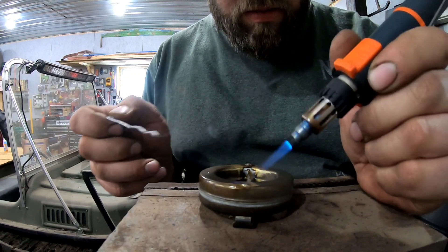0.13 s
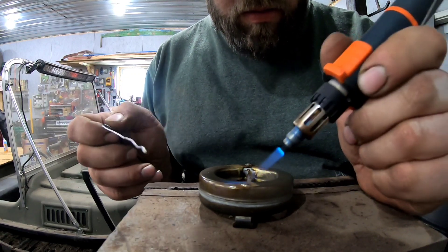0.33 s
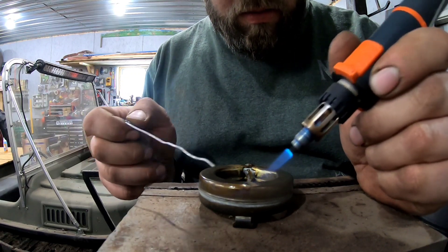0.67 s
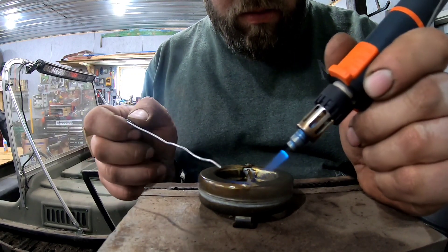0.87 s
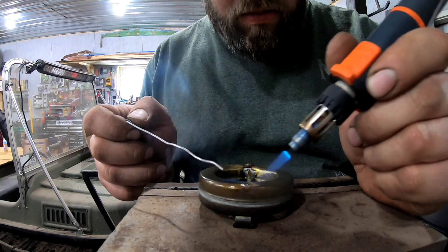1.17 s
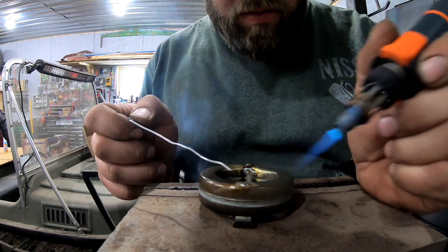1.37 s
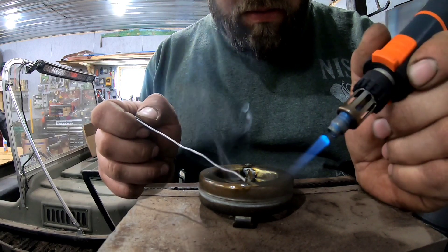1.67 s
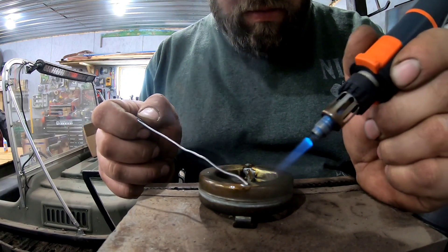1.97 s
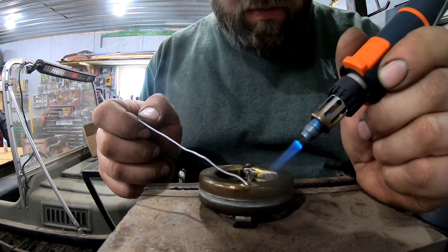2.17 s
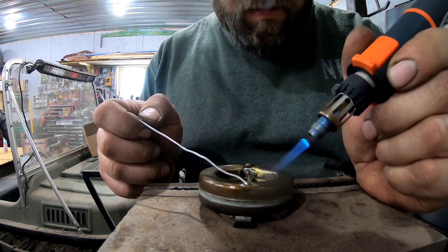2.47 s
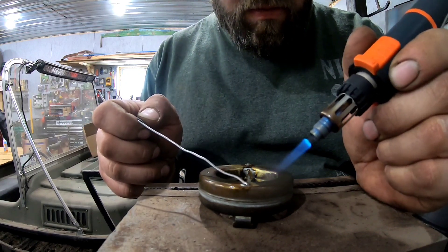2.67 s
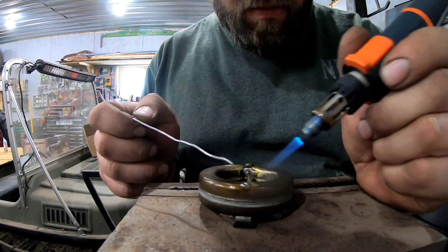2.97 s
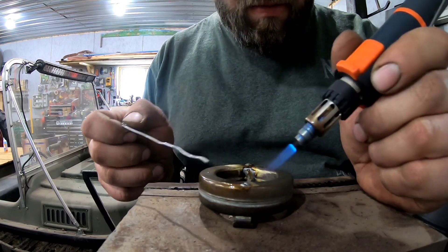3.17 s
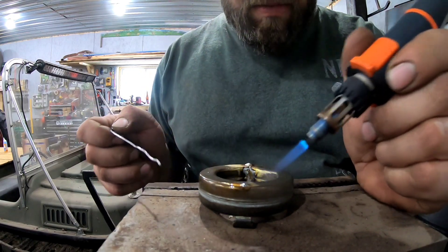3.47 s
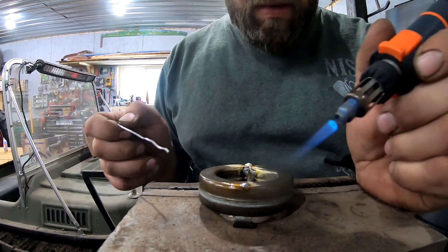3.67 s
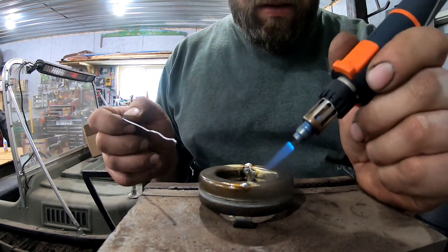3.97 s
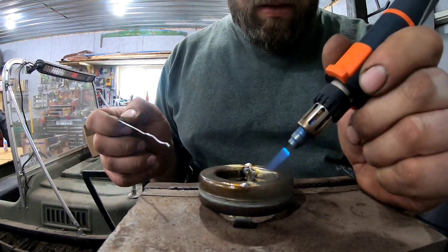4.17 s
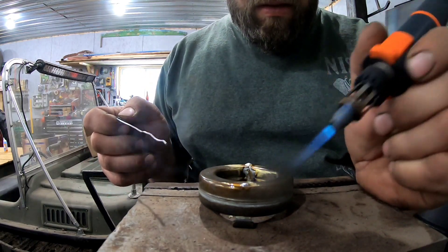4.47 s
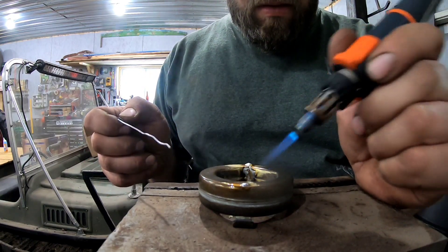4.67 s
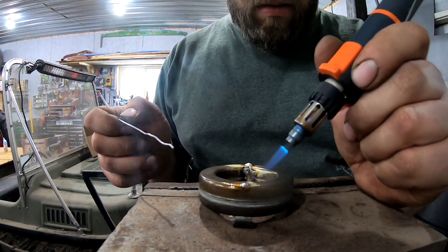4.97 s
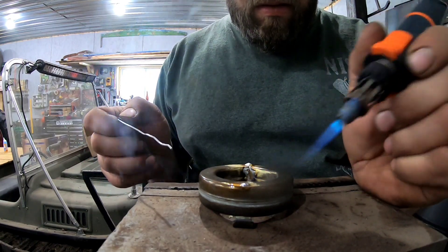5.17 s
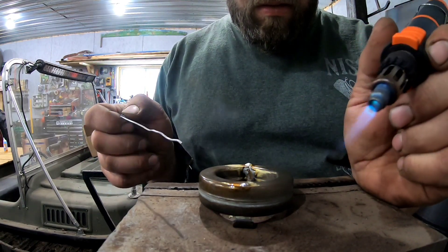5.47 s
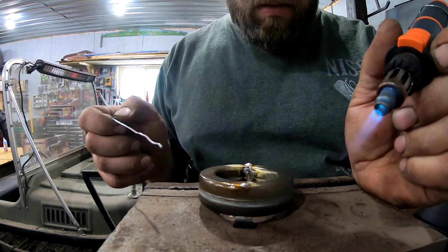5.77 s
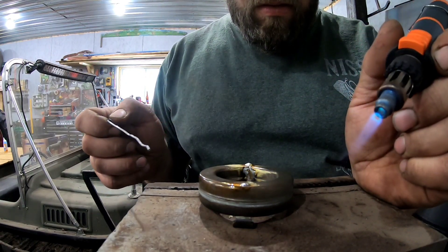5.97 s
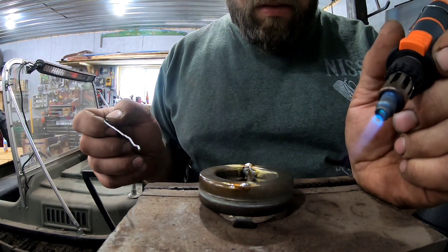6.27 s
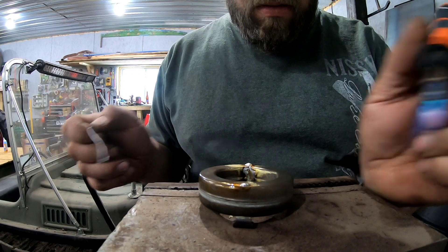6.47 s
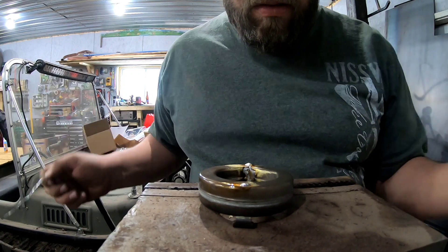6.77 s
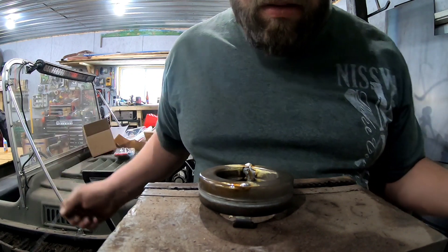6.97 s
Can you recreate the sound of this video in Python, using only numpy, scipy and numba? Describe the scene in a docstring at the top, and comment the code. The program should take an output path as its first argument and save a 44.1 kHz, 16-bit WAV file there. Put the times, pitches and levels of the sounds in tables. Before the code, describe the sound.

A continuous airy jet with a whistling band around three kilohertz dominates, very near the microphones. A loud, very brief pop comes early, then faint knocks and tiny sizzles. The hiss brightens and phases with brief lifts, then holds louder and more resonant when drawn back. Finally it sweeps off to the right with dull air bumps, leaving a weaker hiss, quiet fan hum and a small low knock.

```python
"""A small butane torch hisses over a brass part on a workshop bench, close to a camera with two microphone ports.
The jet rings the burner tube; reflections off the part and the bench sweep through the hiss with each lift of the flame.
The flux spits once as a cluster of damped modes; soft knocks on the bench and small rustles pass around the work.
A fan drones in the shop as noise through steep resonances; at the end the torch swings away to the right,
with low thumps of air as it passes the right port."""
import sys
import numpy as np
from scipy import signal
from scipy.fft import rfft, irfft
from scipy.io import wavfile
from scipy.ndimage import uniform_filter1d, map_coordinates
from numba import njit

SR = 44100
rng = np.random.default_rng(int(sys.argv[2]) if len(sys.argv) > 2 else 0)


def unload_audio(sound):
    """Save the sound as a 16-bit wav file, at the path given as the first command line argument."""
    columns = np.transpose(np.atleast_2d(sound))
    # keep every value between -1 and 1, then stretch to whole-number steps
    steps = np.round(np.clip(columns, -1, 1) * 32767)
    wavfile.write(sys.argv[1], SR, steps.astype(np.int16))


N = 313548
TIME = np.arange(N) / SR

# the swing away to the right, and the lift over which the jet slips off the part
SWING_AT_S, SWING_S, SLIP_CM = 6.6, 0.3, .8


def undb(db):
    """Decibels to gain."""
    return 10 ** (np.asarray(db) / 20)


def unit(x):
    """Scale to rms 1."""
    return x / np.sqrt(np.mean(x ** 2))


def curves(table):
    """Each column of a timed table, sample by sample."""
    s, *columns = np.transpose(table)
    return [np.interp(TIME, s, column) for column in columns]


def pan(db):
    """Left and right gains for a level difference, left minus right."""
    return undb(np.array([[.5], [-.5]]) * db)


def per_bin(points):
    """A table over frequency, joined on a log axis."""
    hz, value = np.transpose(points)
    bin_hz = np.arange(N // 2 + 1) * SR / N
    return np.interp(np.log(bin_hz + 1), np.log(hz), value)


def coloured(points):
    """Noise with the given spectrum, rms 1."""
    white = rfft(rng.standard_normal(N))
    return unit(irfft(white * undb(per_bin(points)), N))


@njit
def svf(x, hz, width):
    """State-variable band-pass, peak gain 1, whose centre may move."""
    y, band, low = np.empty(len(x)), 0., 0.
    for i in range(len(x)):
        g = np.tan(np.pi * hz[i] / SR)
        damping = width / hz[i]
        v = (band + g * (x[i] - low)) / (1 + g * (g + damping))
        band = 2 * v - band
        low = low + 2 * g * v
        y[i] = damping * v
    return y


def resonance(hz, width_hz):
    """Noise through two equal band-passes, each of the given width: a steep resonance, rms 1."""
    hz = hz * np.ones(N)
    once = svf(rng.standard_normal(N), hz, float(width_hz))
    return unit(svf(once, hz, float(width_hz)))


def notch(x, hz, width_hz, depth):
    """Cut a band out of the sound at both ports."""
    depth = np.clip(depth, 0, 1)
    return np.array([port - depth * svf(port, hz * np.ones(N), float(width_hz)) for port in x])


def walk(rate):
    """Random levels drawn at the given rate per second and smoothed twice; rms 1."""
    k = int(SR / rate)
    steps = np.repeat(rng.standard_normal(N // k + 1), k)
    return unit(uniform_filter1d(uniform_filter1d(steps, k), k)[:N])


def ring(start, hz, t60, rise):
    """One damped mode with a rounded attack."""
    t = np.maximum(TIME - start, 0)
    decay = np.exp(-np.log(1000) * t / t60)
    return np.sin(2 * np.pi * hz * t) * decay * (1 - np.exp(-t / rise))


def puff(start, length):
    """An envelope that peaks at 1 after the given length and dies away more slowly."""
    age = np.maximum(TIME - start, 0) / length
    return age * np.exp(1 - age)


def ease(start, length):
    """A hand movement from 0 to 1 that starts and stops smoothly."""
    return .5 - .5 * np.cos(np.pi * np.clip((TIME - start) / length, 0, 1))


def echo(x, lag_ms):
    """The sound a moving lag later."""
    return map_coordinates(x, [np.arange(N) - lag_ms * SR / 1000], order=3, mode="nearest")


def bounce(x, gap_cm):
    """The sound at each port back from a surface the given gap away, there and back."""
    sound_cm_per_ms = 34.3
    return np.array([echo(port, 2 * gap_cm / sound_cm_per_ms) for port in x])


def room(x, t60):
    """Diffuse answer of the surroundings: a decaying noise tail, unrelated at the two ports."""
    t = TIME[:SR // 2]
    decay = np.exp(-np.log(1000) * t / t60) * (t > .005)
    tail = rng.standard_normal((2, len(t))) * decay
    tail = tail / np.sqrt(np.sum(tail[0] ** 2))
    return signal.fftconvolve(x[None], tail, axes=1)[:, :N]


def lifted():
    """Height of the flame above its working place in cm: each lift rises, holds and falls."""
    # the hand lifts the flame off the part: (start [s], rise [s], hold [s], fall [s], height [cm])
    lifts = [(-.29, .16, .22, .21, .74), (1.36, .18, .05, .17, .88), (3.62, .24, .07, .17, 1),
             (4.47, .18, .07, .17, .88), (5.14, .28, 1.6, .4, 1.66)]
    return sum(cm * (ease(s, rise) - ease(s + rise + hold, fall)) for s, rise, hold, fall, cm in lifts)


def shop(air_db=-60.0, air_waver_db=1.47, fan_swell_db=1.1):
    """A fan's swelling drone, the same at both ports, over a wavering rush of air only partly alike at them."""
    # spectrum of the shop's air: (frequency [Hz], relative level [dB])
    air_spectrum = [(25, -27), (60, -16), (100, -23), (150, -3), (270, -1.5), (340, -9), (480, -12),
                    (720, -7), (950, -16), (1200, -13), (1450, -16), (4200, -29), (6400, -13.5),
                    (8000, -15), (10000, -23.5), (15000, -42.5)]
    # likeness of the air at the two ports: (frequency [Hz], correlation [-1 to 1])
    port_likeness = [(30, 0.53), (130, 0.69), (280, 0.72), (600, -0.052), (1400, -0.037), (4000, 0.34),
                     (12000, -0.44)]
    # the fan's drone: (frequency [Hz], width of each filter pass [Hz], rms level before the swell [dB])
    fan_modes = [(58.4, 11, -95.5), (172.9, 16.6, -64.5), (235.2, 49, -63.5)]
    likeness = np.clip(per_bin(port_likeness), -1, 1)
    # the shared and the opposed part of the air set the correlation
    mid, side = (irfft(rfft(coloured(air_spectrum)) * np.sqrt((1 + sign * likeness) / 2), N)
                 for sign in (1, -1))
    air = np.array([mid + side, mid - side]) * undb(air_db + air_waver_db * walk(5.74))
    drone = sum(undb(db + fan_swell_db * walk(4.05)) * resonance(hz, width) for hz, width, db in fan_modes)
    return pan(-1.0) * air + drone


def thumps_and_puffs(thump_port_db=-5, puff_port_db=-12.0):
    """Knocks and air thumps as low damped modes; brief or slow puffs of band noise; all toward the right."""
    # soft knocks on the bench; the rows from 6.6 to 6.685 s are low thumps of air as the torch swings past
    # the right port: (time [s], level before panning [dB], pitch [Hz], t60 [s])
    low_thumps = [(1.8, -53, 75, 0.082), (2.02, -52, 70, 0.065), (2.61, -56, 90, .1), (2.9, -59, 85.4, .1),
                  (3.15, -59, 78, 0.11), (3.62, -62, 72, 0.15), (6.6, -56, 60, .1), (6.62, -44, 48, .09),
                  (6.63, -47, 105, 0.087), (6.685, -49, 60, .12), (7.08, -42, 182, 0.48)]
    # small sizzles and rustles around the work; the 240 Hz row is a slow low swell of the shop's drone, the
    # 9300 Hz row a brief treble flare of the jet as the nozzle sweeps past the camera: (start [s],
    # time to peak [s], rms level of the noise before envelope and panning [dB],
    # frequency [Hz], width of each filter pass [Hz])
    noise_puffs = [(1.412, .009, -62, 8060, 3800), (2.604, .27, -70, 240, 163),
                   (6.597, .04, -64, 9300, 2500), (6.605, .016, -60, 1890, 800),
                   (6.983, 0.0056, -57, 2440, 1310)]
    thumps = sum(undb(db) * ring(s, hz, t60, rise=0.013) for s, db, hz, t60 in low_thumps)
    puffs = sum(undb(db) * puff(s, length) * resonance(hz, width)
                for s, length, db, hz, width in noise_puffs)
    return pan(thump_port_db) * thumps + pan(puff_port_db) * puffs


def spit(at_s=1.05355, room_db=-12.5, scatter_db=-19, low_cut_hz=110):
    """Hot flux bursts: a dry snap with a short thud under it, scattered by the things on the bench."""
    # what rings when the flux spits: (pitch [Hz], t60 [s], level before low cut and panning [dB], rise [s])
    spit_modes = [(227, 0.013, -16.5, 0.0021), (1160, 0.0064, -15, 0.00098), (2010, 0.034, -40, .001),
                  (2400, 0.0035, -10, 0.0005), (4720, .0025, -29, .000078), (7040, 0.0041, -26, .0003),
                  (11400, 0.0026, -41, .0001)]
    snap = sum(undb(db) * ring(at_s, hz, t60, rise) for hz, t60, db, rise in spit_modes)
    snap = signal.sosfilt(signal.butter(2, low_cut_hz, "high", fs=SR, output="sos"), snap)
    answer = undb(room_db) * room(snap, t60=0.28)
    scatter = undb(scatter_db) * room(snap, t60=0.033)
    return pan(-1.4) * snap + answer + scatter


def palm():
    """Drawn back, the nozzle lies in the hollow of the hand, which rings with the jet until the hand swings off."""
    # resonances of the cupped hand: (frequency [Hz], width of each filter pass [Hz],
    # rms level fully cupped, before panning [dB], left minus right [dB])
    hand_modes = [(2270, 930, -62.8, -3.5), (3290, 460, -52.5, -6.5), (5160, 740, -63.5, -9),
                  (6550, 474, -55, -5), (8730, 960, -66, 6), (11300, 2200, -78.5, -15)]
    cup_from_cm, cup_over_cm = .62, .65  # lift at which the nozzle enters the hand, and the way in
    uncup_at_s, uncup_s = 6.66, 0.3
    cupped = np.clip((lifted() - cup_from_cm) / cup_over_cm, 0, 1) * (1 - ease(uncup_at_s, uncup_s))
    return cupped * sum(pan(port_db) * undb(db) * resonance(hz, width)
                        for hz, width, db, port_db in hand_modes)


def beam(at_s=7.1, rise_s=0.12, db=-49, hz=6750, width_hz=3500, port_db=3.0):
    """The nozzle turns toward the camera: a treble flare of band noise, only just beginning as the scene ends."""
    aim = ease(at_s, rise_s) - ease(at_s + rise_s, rise_s)
    return pan(port_db) * undb(db) * aim * resonance(hz, width_hz)


def burner_jet(lift, swing, rush_db=-56.0, flutter_db=0.69):
    """Turbulence rings the burner tube and the flame adds a broad rush; the level of both flutters."""
    # higher tube resonances: (frequency [Hz], width of each filter pass [Hz],
    # rms level before flutter and panning [dB], left minus right [dB])
    tube_modes = [(3570, 447, -64, 3), (6434, 1400, -49.5, 2), (7440, 530, -64, -10),
                  (8400, 860, -65.5, -6)]
    # the flame's broad rush: (frequency [Hz], relative level [dB])
    rush_spectrum = [(300, -2.5), (700, -0.5), (1300, -23), (1700, -2.5), (2300, -2), (3000, 6.6),
                     (4300, 7.5), (5300, -1.3), (7000, -7), (9500, -0.6), (10300, -21.5), (11200, -9.5),
                     (12200, -38), (13500, -28), (15000, -33)]
    # the lowest resonance climbs slowly as the burner runs, rises with lift and drops in the swing
    note_hz = 3032 + 12.4 * TIME + 34 * lift - 160 * swing ** 2
    note_width_hz, note_db, swing_note_db, note_port_db = 696, -50.5, -2.5, -3
    note = (note_hz, note_width_hz, note_db + swing_note_db * swing, note_port_db)
    tube = sum(pan(port_db) * undb(db) * resonance(hz, width)
               for hz, width, db, port_db in [note, *tube_modes])
    return (tube + undb(rush_db) * coloured(rush_spectrum)) * undb(flutter_db * walk(25.105))


def reflected(jet, lift, hand_share=.22):
    """Part, bench and hand return delayed copies that cancel bands of the jet; lifting lengthens the first two paths."""
    # working grip, drifting: (time [s], gap from nozzle to part [cm], gap from nozzle to hand [cm])
    grip = [(0, 3.76, 18.5), (.4, 3.2, 21), (.9, 3.25, 21), (1.33, 3.1, 20), (1.48, 3.5, 21),
            (1.8, 4.18, 22.3), (2.3, 3.7, 21), (3.05, 3.89, 21.6), (3.3, 3.32, 21.3), (3.65, 3.62, 23.5),
            (4.1, 3.39, 25), (4.45, 3.27, 25), (4.65, 3.62, 25), (4.9, 3.4, 24.5), (5.17, 3.31, 24.5),
            (5.7, 3.86, 20), (6.6, 3.64, 19)]
    # the part, then the bench behind it: (distance with the nozzle touching [cm], gain per cm of gap [cm/cm],
    # gain per cm of lift [cm/cm], share reflected to left and to right with the flame on the part [0-1],
    # the same two shares with the flame off it [0-1])
    surfaces = [(.23, .93, .74, .48, .53, .13, .35), (6.96, .8, .8, .2, .26, .32, .4)]
    gap_cm, hand_cm = curves(grip)
    close = np.exp(-(lift / SLIP_CM) ** 2)  # 1 with the flame on the part, toward 0 off it
    total = hand_share * close * bounce(jet, hand_cm)
    for cm, per_gap, per_lift, on_left, on_right, off_left, off_right in surfaces:
        on, off = np.array([[on_left], [on_right]]), np.array([[off_left], [off_right]])
        share = on * close + off * (1 - close)
        total = total + share * bounce(jet, cm + per_gap * gap_cm + per_lift * lift)
    return total


def torch(work_db=-3, clear_db_per_cm=1.96, room_db=-19):
    """The jet less its reflections, louder as the nozzle comes clear and fading right in the swing; the shop answers."""
    lift, swing = lifted(), ease(SWING_AT_S, SWING_S)
    jet = burner_jet(lift, swing)
    left, right = jet - reflected(jet, lift)
    # a narrow dip at the right port falls in pitch with lift
    dip_depth, dip_hz, dip_width_hz = .72, 6985 - 420 * lift, 490
    right = right - dip_depth * svf(right, dip_hz, float(dip_width_hz))
    swing_db, swing_waver_db, swing_pan_db = -14, 2.2, -14.5
    level_db = work_db + clear_db_per_cm * lift + (swing_db + swing_waver_db * walk(14)) * swing
    direct = np.array([left, right]) * undb(level_db) * pan(swing_pan_db * swing)
    return direct + undb(room_db) * room(jet.mean(axis=0), t60=0.2)


def hollow(x):
    """Two narrow notches wander as the grip shifts and shift with each lift; swung away, the hiss turns hollow."""
    # the lower notch: (time [s], centre [Hz], depth [0-1])
    notch_path = [(0, 3380, .2), (1.33, 3440, .1), (1.43, 4300, .65), (1.55, 3450, .3), (1.78, 3505, .65),
                  (2.1, 4010, .75), (3.1, 3975, .88), (3.35, 4090, 0), (3.62, 4175, .5), (3.76, 3650, .55),
                  (4.05, 3500, .35), (4.46, 3475, .4), (4.53, 4260, .85), (4.63, 3650, .55),
                  (5.15, 3500, .45), (5.22, 4370, .85), (5.29, 3550, .35), (5.36, 2610, .45),
                  (6.6, 2600, .5), (6.8, 2640, .2)]
    width_hz, step_hz, second_share = 320, 920, .7
    hz, depth = curves(notch_path)
    close = np.exp(-(lifted() / SLIP_CM) ** 2)
    x = notch(x, hz, width_hz, depth)
    # the upper notch fades as the flame leaves the part
    x = notch(x, hz + step_hz, width_hz, second_share * close * depth)
    away_hz, away_width_hz, away_depth = 4500, 2200, .55
    return notch(x, away_hz, away_width_hz, away_depth * ease(SWING_AT_S, SWING_S) ** 2)


def ports(x):
    """The torch meets the left port a little late, later still when lifted or swung to the right."""
    lag_ms = .012 + .012 * lifted() + .04 * ease(SWING_AT_S, SWING_S)
    return np.array([echo(x[0], lag_ms), x[1]])


def scene():
    """Workshop, thumps and puffs, and spitting flux around the torch."""
    flame = ports(hollow(torch() + palm() + beam()))
    return shop() + thumps_and_puffs() + spit() + flame


def record(dry, top_hz=15200):
    """The camera cuts the top with a steep low-pass."""
    return signal.sosfilt(signal.ellip(8, .2, 70, top_hz, fs=SR, output="sos"), dry)


dry = scene()
out = record(dry)
unload_audio(out)
```